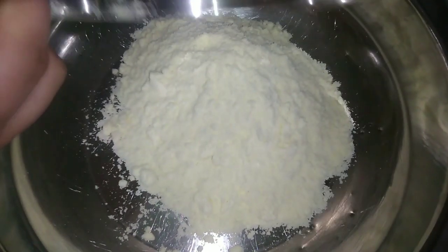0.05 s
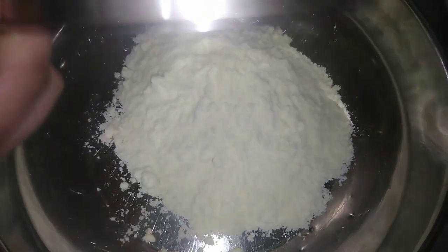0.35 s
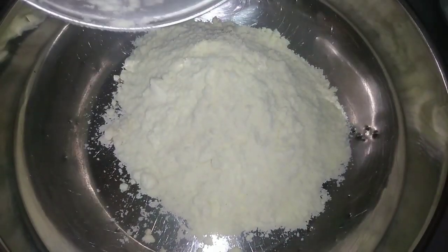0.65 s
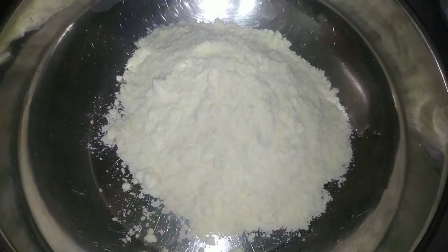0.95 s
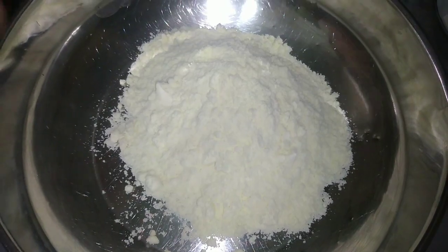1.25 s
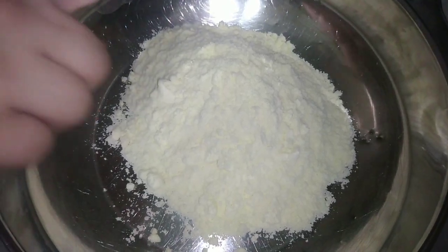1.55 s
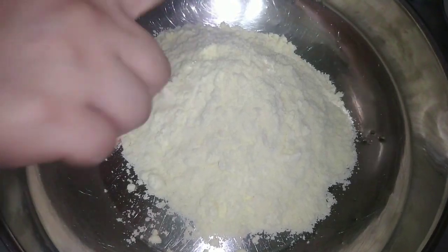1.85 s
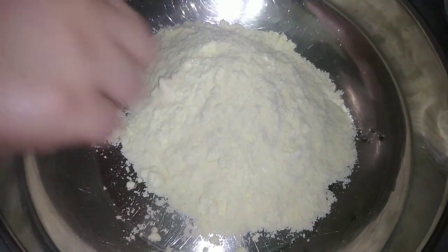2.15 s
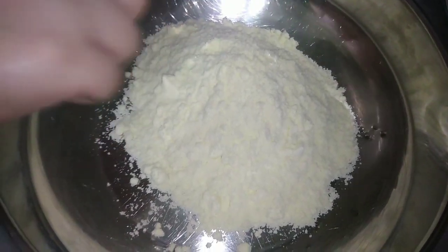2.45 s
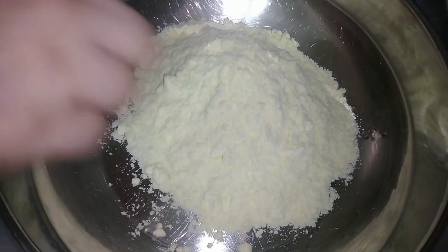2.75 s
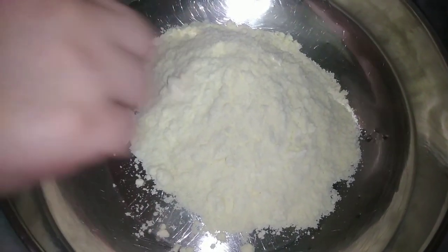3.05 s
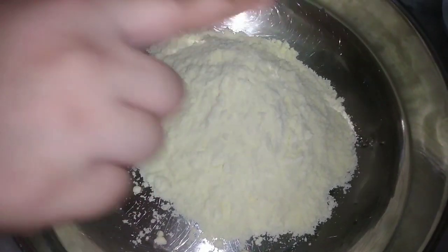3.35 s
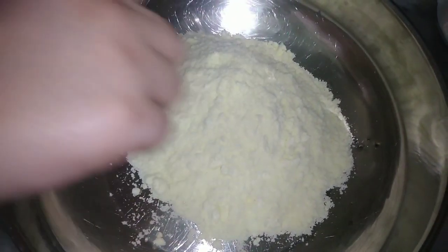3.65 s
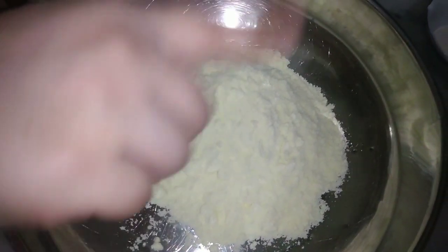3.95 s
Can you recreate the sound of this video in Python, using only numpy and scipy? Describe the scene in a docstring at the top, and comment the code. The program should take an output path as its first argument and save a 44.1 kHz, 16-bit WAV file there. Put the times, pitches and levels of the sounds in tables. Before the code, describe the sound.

A steel vessel clanks against a steel bowl at about 0.1 and 0.3 seconds, ringing faintly, with a light rim tick near 0.7. From about 1 second to 4, fingers rub powder in roughly six soft hissing strokes, and it patters into the bowl. Dull knocks come from further off between 0.9 and 3.3 seconds. A low rumble, faint crickets and a thin insect hiss continue throughout.

```python
"""In a kitchen, a hand-held steel vessel clanks twice against a steel bowl, and both ring on faintly.
Fingers then rub milk powder in six hissing strokes; it patters into the bowl and sets the steel singing.
Grazed metal ticks and rings among soft scuffs and faint thin whistles. Dull knocks come from
further off, over a steady low rumble, two chirping crickets and a distant insect chorus."""
import sys
import numpy as np
from scipy import signal
from scipy.fft import rfft, irfft, next_fast_len
from scipy.io import wavfile
from scipy.ndimage import uniform_filter1d, map_coordinates

SR = 44100
rng = np.random.default_rng(int(sys.argv[2]) if len(sys.argv) > 2 else 0)


def materialize(psi):
    """Save the field psi as 16-bit PCM at rate SR to the path in sys.argv[1].

    A 1-D psi becomes a single channel; in a 2-D psi each row is a channel.
    """
    bounded = np.clip(np.atleast_2d(psi).T, -1, 1)
    quanta = np.round(bounded * 32767).astype(np.int16)
    wavfile.write(sys.argv[1], SR, quanta)


N = 176400

# The ringing modes of the vessel and of the bowl.
# Each row: pitch in Hz, relative level in dB, t60 in seconds, left over right in dB.
VESSEL_MODES = [(2656, -2.5, 0.57, 14), (3625, -17, 0.81, 16.5), (4790, -7.5, 0.53, 15),
                (4860, -12, 0.45, -8), (5010, -7, 0.47, -9), (5400, -28, 0.43, -8), (6060, -12, 0.94, 6.5),
                (6200, 0, 0.39, 13)]
BOWL_MODES = [(1755, -0.5, 0.31, -11.5), (2240, -13, 0.33, -1), (2620, -7, 0.29, 20),
              (2720, -10.5, 0.13, -26), (3490, -16, .28, 26), (3904, -8, 0.19, -0.5),
              (4576, -0.5, 0.073, 3), (5090, -10.5, .18, -12), (5520, -4, 0.089, -6), (5885, -2, 0.042, 8)]


def amp(db):
    """Decibels to gain."""
    return 10 ** (np.asarray(db) / 20)


def unit(x):
    """Scale to rms 1."""
    return x / np.sqrt(np.mean(x ** 2) + 1e-20)


def along(points, hz):
    """Read a curve of (Hz, value) points on a log frequency axis."""
    freqs, values = np.transpose(points)
    return np.interp(np.log(hz + 1), np.log(freqs + 1), values)


def pan(db):
    """Stereo gains that put the left db above the right."""
    return amp(np.array([[db], [-db]]) / 2)


def wobble(rate, size=N):
    """A smooth random curve with rate knots a second."""
    knots = rng.standard_normal(int(size * rate / SR) + 4)
    return map_coordinates(knots, [np.arange(size) * rate / SR])


def filtered(x, response):
    """Shape x with a gain given as a function of Hz."""
    size = next_fast_len(N + SR // 4)
    return irfft(rfft(x, size) * response(np.fft.rfftfreq(size, 1 / SR)), size)[..., :N]


def noise(spectrum, peaks=()):
    """Two unrelated channels of coloured noise with optional resonances, rms 1."""
    def colour(hz):
        peaks_db = sum(db / (1 + (2 * (hz - centre) / width) ** 2) for centre, width, db in peaks)
        return amp(along(spectrum, hz) + peaks_db)
    return unit(filtered(rng.standard_normal((2, N)), colour))


def patchy(x, depth_db=2.8):
    """Let the colour of a hiss shift from moment to moment."""
    spectra = signal.stft(x, nperseg=512)[2]
    patches = uniform_filter1d(rng.standard_normal(spectra.shape[1:]), size=5, axis=0)
    patches = unit(uniform_filter1d(patches, size=7, axis=1))
    return unit(signal.istft(spectra * amp(depth_db * patches), nperseg=512)[1][:, :N])


def fade(attack_s, t60_s):
    """One second of a struck envelope."""
    t = np.arange(SR) / SR
    return (1 - np.exp(-t / attack_s)) * amp(-60 * t / t60_s)


def sine(hz):
    """One second of a sine."""
    return np.sin(2 * np.pi * hz * np.arange(SR) / SR)


def band(hz, octaves):
    """One second of stereo noise around a pitch."""
    freqs = np.fft.rfftfreq(SR, 1 / SR) + 1
    skirt = (1 + (np.log2(freqs / hz) / octaves) ** 2 / 4) ** 4
    return unit(irfft(rfft(rng.standard_normal((2, SR))) / skirt, SR))


def add(track, start, sound):
    """Mix a sound in at start seconds."""
    part = track[:, max(0, round(start * SR)):][:, :sound.shape[-1]]
    part += sound[..., :part.shape[1]]


def room(x, wet_db, alike=0):
    """Add the kitchen's reflections as a noise tail, wide at alike=0 and mono at 1."""
    # The kitchen's decay. Each row: frequency in Hz, t60 in seconds.
    decay = [(150, 0.24), (600, 0.53), (2500, 0.36), (5000, 0.29), (8000, 0.16), (13000, 0.33)]
    hz, t, spectra = signal.stft(rng.standard_normal((2, SR // 3)), SR, nperseg=256)
    tail = signal.istft(spectra * amp(-60 * t / along(decay, hz)[:, None]), SR, nperseg=256)[1]
    turn = np.arccos(np.clip(alike, 0, 1)) / 2
    tail = np.cos(turn) * tail[0] + np.sin(turn) * tail[1] * np.array([[1], [-1]])
    x = np.atleast_2d(x)
    wet = signal.fftconvolve(x, tail / np.linalg.norm(tail[0]), axes=1)[:, :x.shape[1]]
    return x + amp(wet_db) * wet


def rumble(level_db=-47.5):
    """A steady low bed with room resonances, nearly mono around 100 Hz and wider above."""
    # The bed's colour. Each row: frequency in Hz, relative level in dB.
    colour = [(20, -27), (38, -17), (60, -13.5), (80, -4), (100, 4.5), (125, -0.5), (150, -4), (200, 1.5),
              (280, 2), (360, -6.5), (560, -9), (760, -12), (900, -23), (1120, -19), (1350, -44),
              (2000, -38.5), (5000, -55.5), (9000, -76), (14000, -48.5)]
    # Room resonances. Each row: centre in Hz, width in Hz, boost in dB.
    resonances = [(127.8, 5.6, 9), (168.7, 8.2, 10), (206, 5.6, 1), (264, 23, -3)]
    # Stereo image. Each row: frequency in Hz, likeness of left and right from 0 to 1.
    likeness = [(40, 0.38), (100, 1), (280, 0.89), (630, 0.28), (1300, 0), (5000, 0.085)]

    def mid_side(hz):
        turn = np.arccos(np.clip(along(likeness, hz), -1, 1)) / 2
        return np.array([np.cos(turn), np.sin(turn)])
    mid, side = filtered(noise(colour, resonances), mid_side)
    return amp(level_db) * unit(np.array([mid + side, mid - side]))


def insect_chorus(level_db=-53):
    """Distant insects blur into a thin, steady hiss on the left."""
    # The chorus's colour. Each row: frequency in Hz, relative level in dB.
    colour = [(5600, -35), (6150, -50), (6400, -9.5), (6580, -1.5), (6900, -7.5), (7100, 3.5), (7380, 7),
              (7700, -4), (7870, 2), (8000, -27), (8200, -49), (9000, -98)]
    return amp(level_db) * pan(db=6) * noise(colour)


def ring(modes, bright_db=0):
    """Long steel modes waver in level and phase as the metal moves; the higher ones are rougher."""
    waver_db, rough_rad = 2.2, 0.45
    t, out = np.arange(SR) / SR, np.zeros((2, SR))
    for hz, db, t60, side in modes:
        pitch_ratio = hz / VESSEL_MODES[0][0]
        level = amp(db + bright_db * np.log2(pitch_ratio) + waver_db * wobble(40, size=SR))
        phase = 2 * np.pi * hz * t + rough_rad * pitch_ratio * wobble(110, size=SR)
        out += pan(side) * level * np.sin(phase) * fade(0.0015, t60)
    return out


def touches():
    """Contacts so light that they only set the steel ringing."""
    # Each row: start in seconds, vessel level in dB, bowl level in dB, brightness in dB per octave.
    contacts = [(0.0, -54.5, -66, 1), (0.145, -48.5, -67.5, -4.5), (0.376, -60.5, -70, 5),
                (2.173, -85, -66, 8.5), (2.311, -93, -70, 10), (2.514, -69, -55.5, -4.5),
                (3.04, -90, -74.5, 10), (3.29, -89, -70.5, 3)]
    out = np.zeros((2, N))
    for start, vessel_db, bowl_db, bright_db in contacts:
        add(out, start, amp(vessel_db) * ring(VESSEL_MODES, bright_db))
        add(out, start, amp(bowl_db) * ring(BOWL_MODES, bright_db))
    return out


def crickets():
    """Two crickets: each chirp is a few wing strokes, each a falling whistle, smeared by the walls."""
    # Each row: start of one chirp in seconds, chirps a second, wing strokes a second.
    rhythms = [(0.068, 10.26, 63), (0.069, 11.18, 67)]
    # Each row: a stroke's opening pitch in Hz, its fall in Hz, level in dB, left over right in dB.
    voices = [(7909, 650, -51, 7), (7416, 970, -55.5, 9)]
    strokes_per_chirp, slip_s, jitter_hz = 4, 0.003, 59.76
    t, out = np.arange(N) / SR, np.zeros((2, N))
    for (start, chirp_rate, stroke_rate), (hz, fall_hz, db, side) in zip(rhythms, voices):
        chirp_time = (t - start + slip_s * wobble(12)) % (1 / chirp_rate)
        stroke = chirp_time * stroke_rate
        pitch = hz - fall_hz * (stroke % 1) + jitter_hz * wobble(70)
        pulses = np.sin(np.pi * stroke) ** 2 * (stroke < strokes_per_chirp)
        song = pulses * amp(1.3 * wobble(31.23)) * np.sin(2 * np.pi * np.cumsum(pitch) / SR)
        out += amp(db) * pan(side) * unit(room(song, wet_db=13))
    return out


def clanks():
    """Vessel hits bowl: a bright crack, the loaded bowl's thud and low push, then both ring on."""
    # Each row: start in seconds, thud, crack and ring levels in dB,
    # thud tilt in dB per octave away from its main mode, push level in dB.
    hits = [(0.083, -12, -21.5, -72, -13.5, -17.5), (0.2714, -16.5, -16.5, -59.5, 2, -18)]
    # The crack's colour. Each row: frequency in Hz, relative level in dB.
    crack_colour = [(300, 7), (1200, 6.5), (1700, -1), (2500, 7), (3300, -1), (4200, 0.5), (4800, 4),
                    (6000, 7.5), (7500, -3.5), (8300, -4.5), (11500, -7), (14500, -12.5)]
    # The loaded bowl's damped low modes.
    # Each row: pitch in Hz, relative level in dB, t60 in seconds, left over right in dB.
    thud_modes = [(359, -12, 0.12, 1.5), (478, -7.5, 0.068, -5.5), (558, 7.5, 0.019, 0.5),
                  (693, -14, 0.12, 4), (1157, -8.5, 0.037, -8)]
    main_hz, thud_delay_s, thud_attack_s = thud_modes[2][0], 0.00213, 0.0016
    out = np.zeros((2, N))
    for start, thud_db, crack_db, ring_db, tilt_db, push_db in hits:
        crack = noise(crack_colour)[:, :SR] * fade(attack_s=0.0018, t60_s=0.025) * pan(db=3)
        add(out, start, amp(crack_db) * room(crack, wet_db=-5))
        add(out, start, amp(ring_db) * (ring(VESSEL_MODES) + ring(BOWL_MODES)))
        thud = np.zeros((2, SR))
        for hz, db, t60, side in thud_modes:
            level = amp(db + tilt_db * abs(np.log2(hz / main_hz)))
            thud += pan(side) * level * sine(hz) * fade(thud_attack_s, t60)
        push = sine(hz=210) * fade(thud_attack_s, t60_s=0.016)
        body = -(amp(thud_db) * thud + amp(push_db) * push)
        add(out, start + thud_delay_s, room(body, wet_db=-13.5, alike=0.79))
    return out


def bright_ticks():
    """Grazing the rim gives a tiny, bright burst of noise; so does a clump of powder landing on the steel at
    2.515 s."""
    # Each row: start in seconds, level in dB, centre in Hz, width in octaves,
    # left over right in dB, room send in dB.
    ticks = [(0.186, -40.5, 4500, 0.26, -1, 1), (0.748, -35, 3260, 0.37, 11.5, -6),
             (1.586, -47.5, 3030, 0.22, 20, -5.5), (2.173, -52.5, 3640, 0.099, -13, -13),
             (2.515, -43.5, 4570, 0.45, -10, -1)]
    out = np.zeros((2, N))
    for start, db, hz, octaves, side, wet_db in ticks:
        tick = band(hz, octaves) * fade(attack_s=0.0015, t60_s=0.015)
        add(out, start, amp(db) * pan(side) * room(tick, wet_db))
    return out


def soft_swells(flutter_db=3.3):
    """Uneven swells of narrow noise: handling scuffs, faint thin whistles and a lingering steel tone."""
    # Each row: start and length in seconds, level in dB, centre in Hz, width in octaves,
    # left over right in dB.
    swells = [(0.53, 0.1, -74.5, 8680, 0.016, -3), (0.879, 0.13, -56.5, 1084, 0.072, 1),
              (0.953, 0.077, -71, 4870, 0.46, 14), (1.175, 0.1, -70, 5120, 0.16, 8),
              (1.165, 0.15, -72.5, 1620, 0.1, 2), (1.133, 0.16, -75.5, 2740, 0.032, 13),
              (1.996, 0.092, -76, 2330, 0.057, 17.5), (2.012, 0.098, -63.5, 1260, 0.038, 2),
              (2.166, 0.35, -75.5, 2567, 0.011, 15), (3.027, 0.083, -74.5, 2760, 0.034, 7),
              (3.226, 0.16, -74, 2120, 0.12, 14), (3.842, .22, -64, 1334, 0.093, 3),
              (3.891, 0.3, -65.5, 2200, 0.11, 0)]
    t, out = np.arange(SR) / SR, np.zeros((2, N))
    for start, length, db, hz, octaves, side in swells:
        swell = np.sin(np.pi * np.minimum(t / length, 1))
        level = amp(db + flutter_db * wobble(153.5, size=SR))
        add(out, start, level * swell * pan(side) * band(hz, octaves))
    return room(out, wet_db=-8)


def knocks(muffle_hz=1500):
    """Dull blows further off, two modes and a scuff each, heard largely through the room."""
    # Each row: start in seconds, level in dB, pitch in Hz, left over right in dB, room send in dB.
    blows = [(0.925, -36.5, 606, 4, 5), (1.184, -26.5, 600, 5, 2.5), (1.205, -40.5, 550, -7, 11),
             (1.493, -30, 566, 7, 1), (1.794, -32.5, 625, 3.5, 2), (1.84, -36.5, 574, 4, -3),
             (2.06, -42.5, 500, 0, 11), (2.086, -38, 736, 0, 4.5), (2.394, -42, 594, 3, 8.5),
             (2.42, -40, 580, 5.5, 9), (2.857, -43.5, 610, 14, 1), (3.252, -37.5, 700, 0, 10.5),
             (3.275, -37, 518, 0.5, 10.5)]
    out = np.zeros((2, N))
    for start, db, hz, side, wet_db in blows:
        tone = sine(hz) + amp(-14) * sine(hz * 1.157)
        scuff = amp(-14) * band(hz, octaves=0.5)[0]
        blow = (tone + scuff) * fade(attack_s=0.0008, t60_s=0.03)
        add(out, start, amp(db) * pan(side) * room(blow, wet_db, alike=0.54))
    return filtered(out, lambda hz: 1 / (1 + (1j * hz / muffle_hz) ** 4))


def powder():
    """Rubbed powder hisses and crunches between the fingers, then patters on the steel in clumps."""
    # Finger rubs, a few to a stroke.
    # Each row: start, length and swell time in seconds, hiss level in dB, landing level in dB.
    rubs = [(0.99, 0.07, 0.082, -70.5, -79), (1.222, 0.085, 0.07, -61, -86), (1.328, 0.13, 0.061, -59, -72),
            (1.382, .115, 0.043, -53.5, -56), (1.477, 0.12, 0.015, -56.5, -53),
            (1.719, 0.056, 0.039, -55, -60), (1.77, 0.18, 0.052, -57.5, -60),
            (1.843, 0.06, 0.074, -47.5, -63), (2.145, 0.098, 0.036, -57, -58.5),
            (2.216, 0.098, 0.03, -54.5, -64), (2.498, 0.13, 0.022, -65.5, -52.5),
            (2.546, 0.14, 0.031, -55.5, -72), (2.969, 0.03, 0.037, -60, -80), (3.0, 0.066, 0.05, -52, -69),
            (3.068, 0.21, 0.044, -56, -64.5), (3.587, 0.053, 0.039, -60, -78),
            (3.634, 0.29, .1, -60.5, -66), (3.81, 0.15, 0.076, -56, -60)]
    # Crumbs being crushed. Each row: start in seconds, level in dB.
    crumbs = [(1.045, -65.5), (1.43, -50), (1.755, -57), (1.893, -45.5), (2.167, -53), (2.685, -50),
              (3.046, -47), (3.232, -50), (3.262, -47), (3.93, -56)]
    # The colours of powder rubbed and powder landing. Each row: frequency in Hz, relative level in dB.
    rub_colour = [(3500, -10.5), (5200, -98), (7400, -15), (8200, -15), (8700, 23), (9100, 16), (9800, 27),
                  (11000, 21), (11600, 26.5), (12800, 15.5), (14300, 15.5)]
    landing_colour = [(1000, 3.5), (2100, -75), (2800, -27), (4200, -50), (5000, -3.5), (5600, 5.5),
                      (6400, 7), (8000, 0.5), (10000, -16)]
    release_t60_s, grain_db, clump_db = 0.06, 3, 2
    t = np.arange(N) / SR
    rubbing, falling, crunch = np.zeros(N), np.zeros(N), np.zeros((1, N))
    for start, length, swell, hiss_db, land_db in rubs:
        rise = np.sin(np.pi / 2 * np.clip((t - start) / swell, 0, 1)) ** 2
        release = amp(-60 * np.maximum(t - start - length, 0) / release_t60_s)
        rubbing = np.maximum(rubbing, amp(hiss_db) * rise * release)
        falling = np.maximum(falling, amp(land_db) * rise * release)
    for start, db in crumbs:
        add(crunch, start, amp(db) * fade(attack_s=0.002, t60_s=0.05))
    grains = unit(amp(grain_db * wobble(rate=800) + clump_db * wobble(rate=120)))
    patter = falling * unit(grains * patchy(noise(landing_colour)) + singing_bowl())
    hiss = np.hypot(rubbing, crunch) * grains * patchy(noise(rub_colour))
    return room(hiss + patter, wet_db=-2.5)


def singing_bowl(width_hz=85, wander_db=5):
    """Countless grains keep the bowl's modes ringing; each comes and goes as the landing spot shifts."""
    out = np.zeros((2, N))
    for hz, db, _, _ in BOWL_MODES:
        mode = filtered(rng.standard_normal((2, N)), lambda f: 1 / (1 + 2j * (f - hz) / width_hz) ** 2)
        tilt_db = 13.5 * np.log2(hz / BOWL_MODES[0][0])  # light grains favour the high modes
        out += mode * amp(db + tilt_db + wander_db * wobble(rate=20))
    return unit(out)


def scene():
    """Steel and powder up close, with knocks, insects and rumble behind."""
    steel = clanks() + touches() + bright_ticks()
    return steel + soft_swells() + powder() + knocks() + crickets() + rumble() + insect_chorus()


def record(dry):
    """Roll off the deepest bass and cut the very top."""
    low_cut_hz, top_hz = 52, 14400
    return filtered(dry, lambda hz: (hz < top_hz) * (1j * hz / (low_cut_hz + 1j * hz)) ** 2)


dry = scene()
out = record(dry)
materialize(out)
```